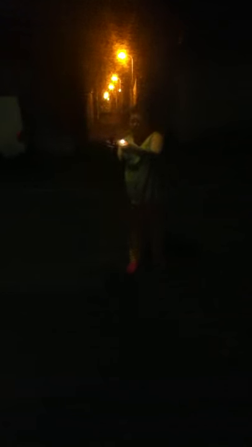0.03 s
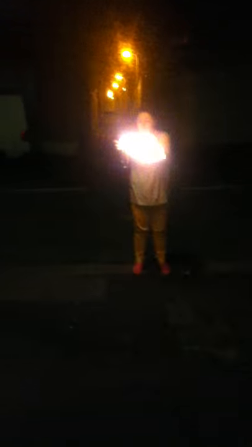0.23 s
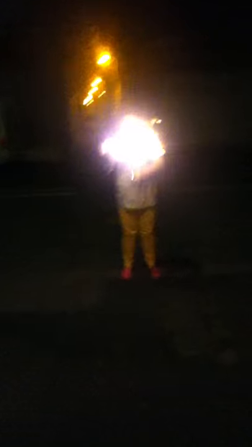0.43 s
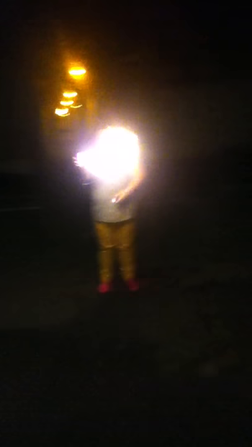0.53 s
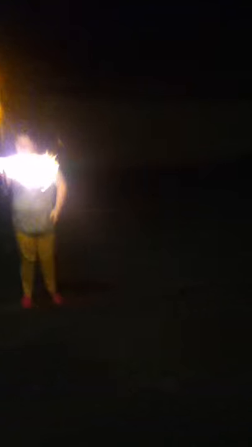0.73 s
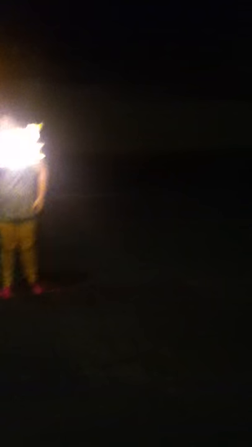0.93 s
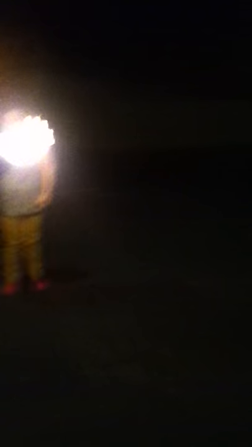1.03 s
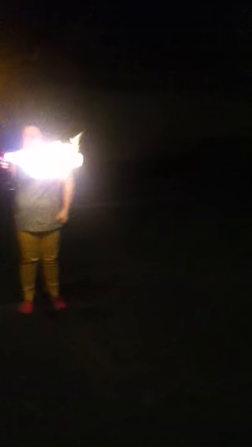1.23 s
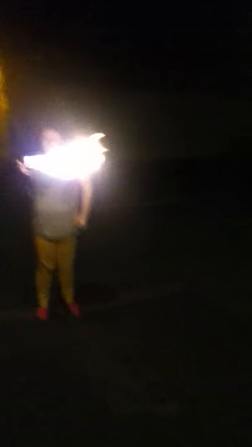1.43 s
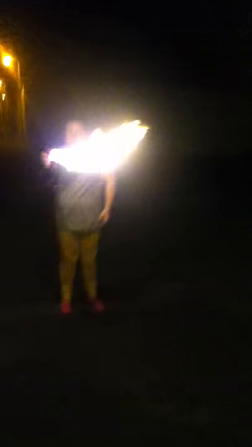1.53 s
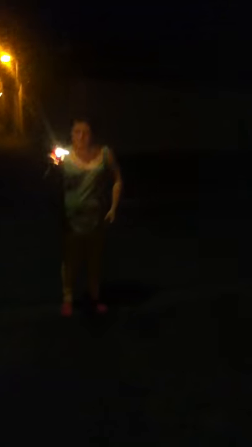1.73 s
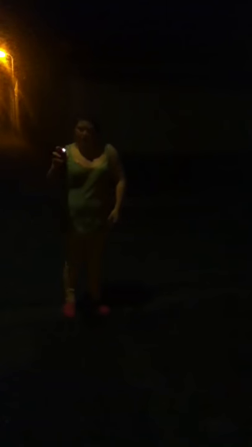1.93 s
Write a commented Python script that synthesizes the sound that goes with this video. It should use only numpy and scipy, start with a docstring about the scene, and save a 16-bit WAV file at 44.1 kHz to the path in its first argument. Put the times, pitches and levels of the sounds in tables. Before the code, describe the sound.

A jet of fire from an aerosol can roars a few metres from the microphone on a quiet night street. A short hiss leads to a deep ignition thump, then the flame crackles and sputters before stopping suddenly.

```python
"""On a quiet street at night, an aerosol can hisses a few metres away. At 0.2 s the spray catches with
a low whoomp, then burns as a roaring jet that flutters, crackles and sputters on its uneven fuel.
As the flame moves, its reflections slide and slowly sweep the roar. At about 1.7 s the valve shuts,
the flame dies, and the house fronts leave a short tail."""
import sys
import numpy as np
from scipy import signal
from scipy.fft import rfft, irfft
from scipy.io import wavfile
from scipy.ndimage import uniform_filter1d, map_coordinates

SR = 44100
rng = np.random.default_rng(int(sys.argv[2]) if len(sys.argv) > 2 else 0)


def master_out(mix):
    """Clip the mix to full scale and print it as 16-bit PCM to the path in sys.argv[1]."""
    frames = np.transpose(np.atleast_2d(mix))
    ceiling = np.clip(frames, -1, 1)
    pcm = np.round(ceiling * 32767).astype(np.int16)
    wavfile.write(sys.argv[1], SR, pcm)


N = 88200
IGNITE_S, SHUT_S = 0.196, 1.728  # the spray catches; the valve shuts

# Hollow resonances of the jet, lowest first. Each row: pitch in Hz at 1 s, width in Hz, relative dB.
HOLLOW_MODES = [(582.4, 28, 4), (679, 29, 1.5), (936.3, 51, 1), (1059, 65, -5.5)]


def undb(db):
    """Decibels to gain."""
    return 10 ** (np.asarray(db) / 20)


def unit(x):
    """Scale to rms 1."""
    return x / np.sqrt(np.mean(x ** 2))


def curve(table, t, column=1):
    """An automation curve: one column of a table, joined by straight lines."""
    rows = np.array(table, float)
    return np.interp(t, rows[:, 0], rows[:, column])


def swell(t, start, rise, hold, decay):
    """Smooth attack, hold and exponential release, in seconds."""
    attack = np.sin(np.pi / 2 * np.clip((t - start) / rise, 0, 1)) ** 2
    return attack * np.exp(-np.maximum(t - start - rise - hold, 0) / decay)


def puff(t, start):
    """The quick envelope of a sputter or hoot."""
    return swell(t, start, rise=0.0062, hold=0.011, decay=0.017)


def walk(rate):
    """Random levels held 1 / rate seconds and slewed, rms 1."""
    hold = max(int(SR / rate), 2)
    steps = rng.standard_normal(N)[np.arange(N) // hold]
    return unit(uniform_filter1d(uniform_filter1d(steps, hold), hold // 2))


def colour(x, eq):
    """EQ through (Hz, dB) points, falling 12 dB an octave beyond both ends."""
    hz, db = np.array(eq, float).T
    f = np.maximum(np.fft.rfftfreq(len(x), 1 / SR), 1)
    skirt = np.minimum(f / hz[0], 1) ** 2 * np.minimum(hz[-1] / f, 1) ** 2
    gain = undb(np.interp(np.log(f), np.log(hz), db))
    return irfft(rfft(x) * skirt * gain, len(x))


def noise(eq):
    """Smooth coloured noise, rms 1."""
    return unit(colour(rng.standard_normal(N), eq))


def resonant(modes):
    """Noise ringing in resonances of (Hz, width in Hz, dB), rms 1."""
    f = np.fft.rfftfreq(N, 1 / SR)
    peaks = sum(undb(db) / (1 + (2 * (f - hz) / width) ** 2) for hz, width, db in modes)
    return unit(irfft(rfft(rng.standard_normal(N)) * peaks, N))


def delayed(x, t, lag_s):
    """A delay line whose lag can slide."""
    return map_coordinates(x, [(t - lag_s) * SR], order=3, mode="mirror")


def street(t):
    """The bed: distant town noise and a faint high whine."""
    # Tone of the night air. Each row: frequency in Hz, relative level in dB.
    town_eq = [(25, -14), (60, -1), (120, -1), (280, -1), (370, 0.5), (440, -11), (550, -2), (1000, -10.5),
               (1700, -10), (3200, -15), (8000, -18.5), (15500, -23.5)]
    town = noise(town_eq) * undb(-57 + 0.56 * walk(rate=18))
    whine = undb(-79) * np.sqrt(2) * np.sin(2 * np.pi * 14993 * t)
    return town + whine


def house_fronts(x, t):
    """The house fronts throw back a weak, dull tail."""
    # Tone of the tail. Each row: frequency in Hz, relative level in dB.
    tail_eq = [(200, 0), (900, -2.5), (4000, -5)]
    t60_s, wet_db = 0.29, -24.5
    response = noise(tail_eq) * swell(t, 0.027, rise=0.039, hold=0, decay=t60_s / np.log(1000))
    response /= np.sqrt(np.sum(response ** 2))
    return undb(wet_db) * signal.fftconvolve(x, response)[:N]


def early_reflections(x, t):
    """One close, steady reflection and three duller ones that slide later, sweeping their combs down."""
    # Bounces off the road and nearby surfaces. Each row: time in seconds, then the three lags in ms.
    lags_ms = [(.2, 1.66, 2.48, 2.58), (.5, 1.78, 2.53, 2.68), (.8, 1.95, 2.58, 2.77),
               (1.1, 2.03, 2.67, 2.85), (1.4, 2.27, 2.88, 3.3), (1.72, 2.52, 3.02, 3.5)]
    # Gain of each sliding bounce against the direct sound.
    gains = [.27, -.2, .2]
    close_gain, dull_hz = 0.094, 6000
    dull = irfft(rfft(x) / np.hypot(1, np.fft.rfftfreq(N, 1 / SR) / dull_hz), N)
    sliding = sum(gain * delayed(dull, t, curve(lags_ms, t, column) / 1000)
                  for column, gain in enumerate(gains, start=1))
    close = close_gain * delayed(x, t, lag_s=0.00107)
    return (x + sliding + close) / np.sqrt(1 + np.sum(np.square(gains)) + close_gain ** 2)


def scatter(x, t, count=8, gain=0.14):
    """Weak echoes off hand, body and ground lengthen as the can moves: fine bands drift in the hiss."""
    lags = 0.009 * (np.arange(count) + 1 + rng.random(count)) / count
    stretch = np.exp(0.12 * (t - 1))
    echoes = sum(delayed(x, t, lag * stretch) for lag in lags)
    return (x + gain * echoes) / np.sqrt(1 + count * gain ** 2)


def spray(t):
    """Propellant hisses from the nozzle, whose narrow resonances fade once the jet burns."""
    # Tone of the hiss. Each row: frequency in Hz, relative level in dB.
    hiss_eq = [(800, -17), (1300, -3), (3000, -2.5), (5500, 2.5), (8000, 1.5), (11000, 2), (15500, -2.5)]
    # Fader ride of the hiss. Each row: time in seconds, level in dB.
    hiss_ride = [(0, -55), (.2, -54), (.45, -57), (.9, -54), (1.3, -54), (1.65, -53), (1.72, -58)]
    # Nozzle resonances. Each row: pitch in Hz, width in Hz, relative level in dB.
    nozzle_modes = [(3470, 110, 0), (7050, 220, -2), (7870, 400, 0), (8150, 200, -3), (8820, 300, -1),
                    (11600, 200, -6)]
    whistle_fade_s, valve_decay_s = 0.24, 0.012
    whistle = undb(-58.5) * resonant(nozzle_modes)
    whistle *= np.exp(-np.maximum(t - IGNITE_S, 0) / whistle_fade_s)
    hiss = noise(hiss_eq) * undb(curve(hiss_ride, t) + 0.92 * walk(rate=30.04))
    valve = np.exp(-np.maximum(t - SHUT_S, 0) / valve_decay_s)
    return valve * (hiss + whistle)


def eddies(eq, rate, spread_db):
    """Dense pops of burning pockets of fuel, of uneven size, rms 1."""
    pops = (rng.random(N) < rate / SR) * rng.standard_normal(N)
    sizes = undb(spread_db * np.clip(rng.standard_normal(N), -2, 2))
    return unit(colour(pops * sizes, eq))


def ignition(t):
    """The flame front snaps through the mist, then the fireball heaves in a few low swings."""
    # The whoomp. Each row: start in seconds, pitch in Hz, level in dB, rise and decay in seconds.
    swings = [(0.2081, 103.7, -22.5, 0.0054, 0.02), (0.228, 194.9, -32.5, 0.012, 0.1),
              (.229, 263, -23.5, 0.0037, 0.016), (.236, 985, -35.5, 0.0094, 0.018)]
    # Tones of the low blast and the bright flash. Each row: frequency in Hz, relative level in dB.
    blast_eq = [(40, -5), (75, 6), (140, -6), (250, 7), (420, -6), (700, 0), (840, -16), (990, -0.5),
                (1180, -21), (1500, -13), (2200, -16.5), (5000, -46)]
    flash_eq = [(900, 6), (1700, 3.5), (3000, 0), (4000, -2), (8500, -8), (15000, -18)]
    # Ring of the swelling fireball. Each row: pitch in Hz, width in Hz, relative level in dB.
    fireball_modes = [(503, 33, 0.5), (719, 13, 1), (998, 17, -10), (1328, 34, -6), (1520, 32, -0.5),
                      (2910, 47, -9)]
    snap_s, snap_rise_s = 0.198, 0.011
    whoomp = sum(undb(db) * swell(t, start, rise, 0.0071, decay) * np.sin(2 * np.pi * hz * (t - start))
                 for start, hz, db, rise, decay in swings)
    blast = noise(blast_eq) * undb(-33.5) * swell(t, snap_s, snap_rise_s, hold=0.02, decay=0.048)
    fireball = resonant(fireball_modes) * undb(-39)
    fireball *= swell(t, 0.191, rise=0.048, hold=0.015, decay=0.016)
    flash = eddies(flash_eq, rate=5000, spread_db=0) * undb(-41)
    flash *= swell(t, snap_s, snap_rise_s, hold=0.011, decay=0.034)
    kindle = noise(flash_eq) * undb(-47.5) * swell(t, 0.163, rise=0.043, hold=0.027, decay=0.029)
    return whoomp + blast + fireball + flash + kindle


def heave(hz):
    """A swing of the burning gas whose pitch wanders from cycle to cycle, rms 1."""
    pitch = hz * (1 + 0.136 * walk(rate=hz))
    return np.sqrt(2) * np.sin(2 * np.pi * np.cumsum(pitch) / SR)


def sputters(t):
    """Uneven spray feeds the flame in short puffs: a deep thump, a hollow body and a rush."""
    # The puffs. Each row: start in seconds, then the levels of thump, body and rush in dB.
    cues = [(.688, -64, -42, -55), (0.769, -46, -38.5, -48), (0.877, -63, -39.5, -49),
            (1.057, -49, -38.5, -60), (1.138, -40, -40.5, -60), (1.244, -42, -44, -50),
            (1.359, -49.5, -46, -45.5), (1.415, -55, -40.5, -50), (1.515, -51, -39, -48),
            (1.593, -50, -34.5, -64), (1.644, -61, -42.5, -49), (1.7, -51, -36.5, -43),
            (1.725, -54, -48, -48)]
    # Tone of the rush. Each row: frequency in Hz, relative level in dB.
    rush_eq = [(300, -6), (600, -0.5), (950, -0.5), (1500, -2), (2500, -19), (6000, -34)]
    layers = np.array([heave(hz=116.6), heave(hz=243.1), noise(rush_eq)])
    return sum(undb(levels) @ layers * puff(t, start) for start, *levels in cues)


def hoots(t):
    """The jet's lowest hollow resonance sings out briefly, twice."""
    hz = HOLLOW_MODES[0][0]
    tone = undb(-44) * np.sqrt(2) * np.sin(2 * np.pi * hz * t)
    return tone * (puff(t, start=1) + puff(t, start=1.184))


def hollow(t):
    """The jet's resonances sink slowly as the flame moves."""
    speed = np.exp(-0.17 * (t - 1))
    return map_coordinates(resonant(HOLLOW_MODES), [np.cumsum(speed)], order=1, mode="wrap")


def quiver(rate):
    """The flame's flutter: a quick random wobble without slow drift, rms 1."""
    wobble = walk(rate)
    return unit(wobble - uniform_filter1d(wobble, size=3000))


def flame(t):
    """The burning jet throbs, rumbles, roars and tears; one flutter shakes all four layers."""
    # Tones of the layers, low to high. Each row: frequency in Hz, relative level in dB.
    throb_eq = [(25, -40), (50, -14), (75, -14.5), (112, 0), (135, -4.5), (165, -11.5)]
    rumble_eq = [(150, -22.5), (192, -2.5), (230, -1.5), (270, -2), (335, -4.5), (400, -16.5), (600, -16.5)]
    roar_eq = [(250, -43), (420, 0), (580, -2), (780, 2), (980, -3), (1250, -3.5), (1800, -7), (2500, -16),
               (4500, -22), (9000, -64)]
    tear_eq = [(900, 11.5), (1800, 7), (2700, 6.5), (3250, 2.5), (3900, 4.5), (4900, 2), (5800, -3),
               (8000, -4.5), (15000, -44)]
    # Fader rides of the layers. Each row: time in seconds, gain in dB.
    throb_ride = [(.3, -44.5), (.38, -47.5), (.45, -51.5), (1.0, -49.5), (1.73, -49.5)]
    rumble_ride = [(.33, -40), (.45, -44.5), (.66, -42.5), (.8, -44), (1.2, -44), (1.73, -42.5)]
    roar_ride = [(.26, -55.5), (.36, -46.5), (.56, -42.5), (.74, -46), (1.0, -44.5), (1.2, -44.5),
                 (1.33, -48.5), (1.46, -53), (1.56, -44.5), (1.738, -46.5)]
    tear_ride = [(.25, -51.5), (.48, -47), (.85, -49.5), (1.2, -47.5), (1.5, -45.5), (1.71, -47),
                 (1.745, -46.5)]
    catch_s = 0.029
    burn_out_s = SHUT_S + 0.0085  # fuel still in the air burns just past the valve
    burning = swell(t, IGNITE_S, rise=catch_s, hold=burn_out_s - IGNITE_S - catch_s, decay=0.012)
    flutter = quiver(rate=80.5)
    throb = noise(throb_eq) * undb(curve(throb_ride, t) + 0.27 * flutter)
    rumble = noise(rumble_eq) * undb(curve(rumble_ride, t) + 0.5 * flutter)
    roar = undb(-2.5) * eddies(roar_eq, rate=5000, spread_db=-0.5) + undb(-4.5) * hollow(t)
    roar *= undb(curve(roar_ride, t) + 1.2 * flutter)
    tear = scatter(eddies(tear_eq, rate=14000, spread_db=1.0), t)
    tear *= undb(curve(tear_ride, t) + 0.5 * flutter)
    return burning * (throb + rumble + roar + tear)


def scene():
    """The burst and its echoes over the quiet street, in mono."""
    t = np.arange(N) / SR
    jet = flame(t) + sputters(t) + hoots(t) + scatter(spray(t), t)
    burst = early_reflections(jet, t) + ignition(t)
    return (burst + house_fronts(burst, t) + street(t))[None]


def record(dry):
    """A steep low-pass takes off the very top."""
    top_hz = 15620
    return signal.sosfilt(signal.ellip(12, 0.1, 80, top_hz, fs=SR, output="sos"), dry)


dry = scene()
out = record(dry)
master_out(out)
```